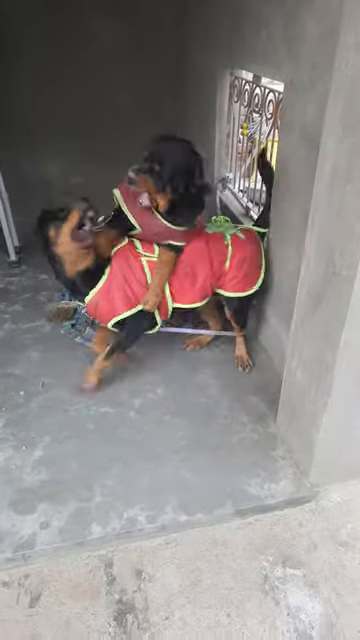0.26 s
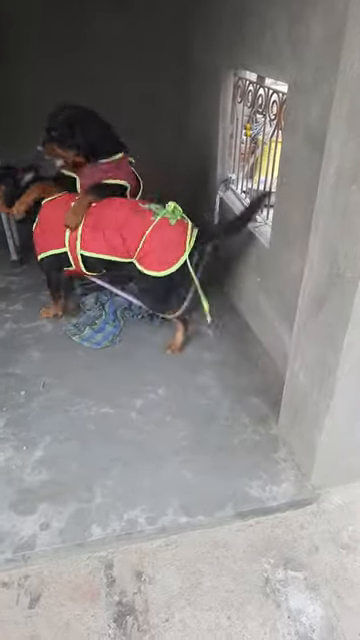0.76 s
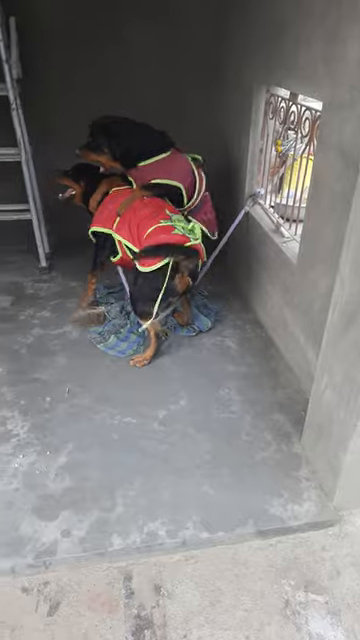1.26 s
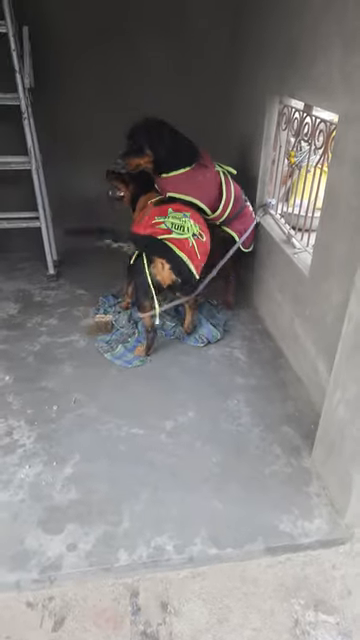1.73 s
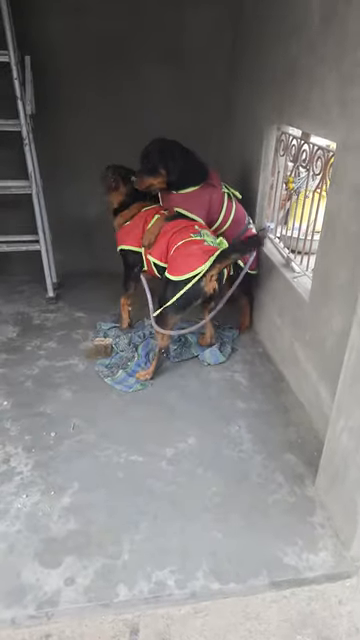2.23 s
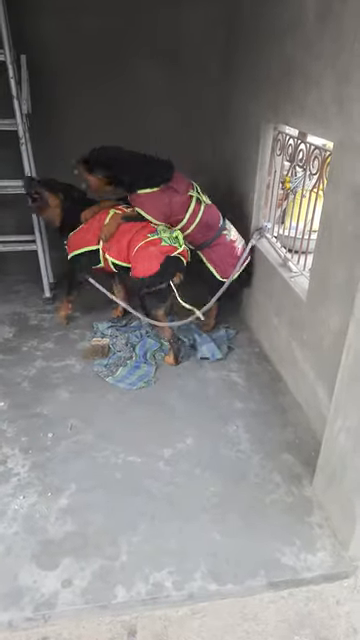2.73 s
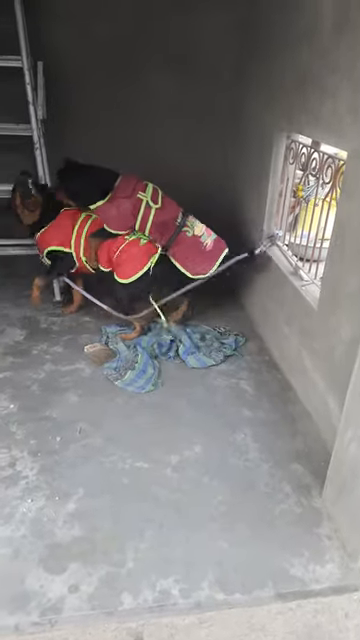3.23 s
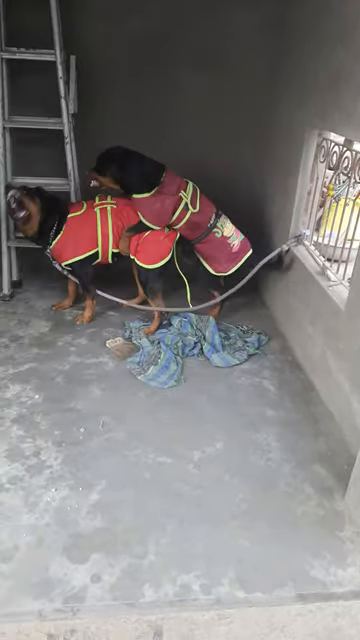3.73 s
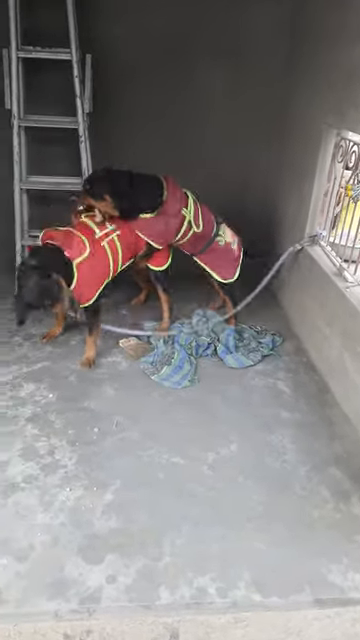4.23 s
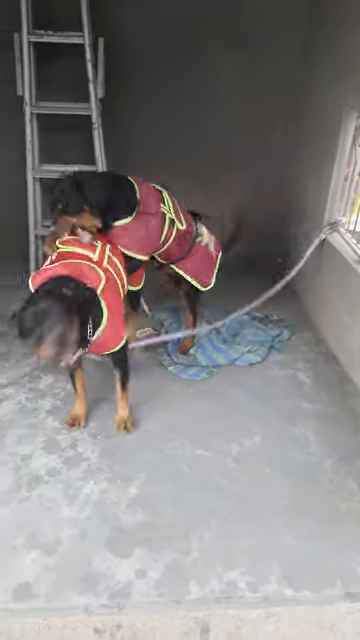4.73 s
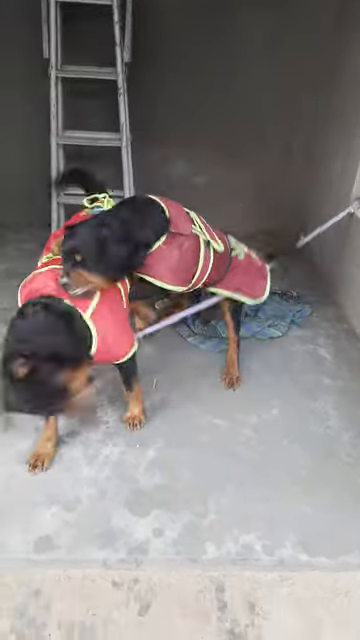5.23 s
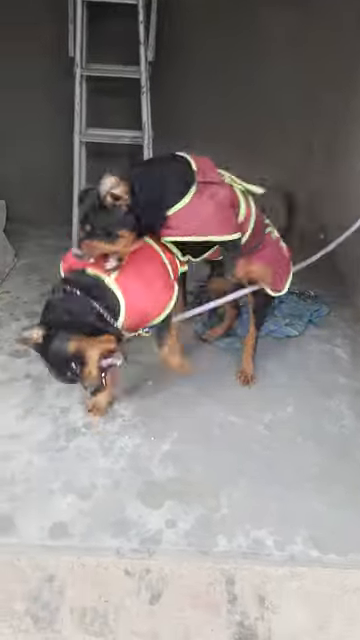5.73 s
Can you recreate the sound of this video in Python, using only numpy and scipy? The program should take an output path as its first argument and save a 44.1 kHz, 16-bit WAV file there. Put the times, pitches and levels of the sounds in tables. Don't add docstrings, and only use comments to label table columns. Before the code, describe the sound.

Two large dogs wrestle in a bare, reverberant concrete room, heard through a stereo phone microphone with a sharp treble edge. Paws and coats scuffle throughout, rising and falling. Two hoarse barks burst out at 0.1 and 0.4 s over a growl, followed by single barks at 0.7, 1.1 and 1.35 s, with firm low thumps near 1.45 s. Growling fills the gap before a bark at 2.0 s; another comes at 2.6 s with the hardest thump just after. A tight flurry runs from 3.2 to 3.8 s, one bark high and more sung. Barks at 4.3 and 4.55 s lead to a thump, then weaker, rising yaps around 5 s, a strong one at 5.3 s and a last at 5.6 s. A long, loud chest drone swells from 5.7 s to the end. Walls ring about half a second after each bark; quiet sounds duck under them.

```python
import sys
import numpy as np
from scipy import signal
from scipy.fft import rfft, irfft
from scipy.io import wavfile
from scipy.ndimage import uniform_filter1d, minimum_filter1d

SR = 44100
rng = np.random.default_rng(int(sys.argv[2]) if len(sys.argv) > 2 else 0)


def ratio_of_db(decibels):
    return 10 ** (np.asarray(decibels, float) / 20)


def master(y):
    cut = np.clip(np.atleast_2d(y).T, -1, 1)
    pcm = np.round(cut * 32767)
    wavfile.write(sys.argv[1], SR, pcm.astype(np.int16))


N = 263277


def evened(x):
    return x / np.sqrt(np.mean(x ** 2) + 1e-20)


def read(points, hz):
    f, value = np.transpose(points)
    return np.interp(np.log(hz + 1), np.log(f + 1), value)


def add(mix, start_s, sound):
    part = mix[..., round(start_s * SR):][..., :sound.shape[-1]]
    part += sound[..., :part.shape[-1]]


def colour(x, db_points):
    n = x.shape[-1]
    return irfft(rfft(x) * ratio_of_db(read(db_points, np.fft.rfftfreq(n, 1 / SR))), n)


def resonate(x, hz, width):
    turn = np.exp(2j * np.pi * np.cumsum(hz * np.ones(len(x))) / SR)
    r = np.exp(-np.pi * width / SR)
    smooth = signal.lfilter([(1 - r) ** 2], [1, -2 * r, r * r], x / turn + 1e-18)
    return 2 * (turn * smooth).real


def wobble(n, span):
    once = uniform_filter1d(rng.standard_normal(n), int(span))
    return evened(uniform_filter1d(once, int(span)))


def swells(rows):
    t = np.arange(N) / SR
    total = ratio_of_db(-61)
    for start, length, db in rows:
        arch = np.sin(np.pi * np.clip((t - start) / length, 0, 1)).clip(0)
        total = total + ratio_of_db(db) * np.sqrt(arch)
    return 20 * np.log10(total)


# (frequency [Hz], left-right correlation [-1 to 1])
PORT_LIKENESS = [(30, 0.3), (70, 0.65), (180, 0.77), (550, 0.42), (1650, 0.09), (4970, -0.03),
                 (15000, -0.03)]


def spread(first, other, same):
    return np.array([first, same * first + np.sqrt(1 - same ** 2) * other])


def wash(db_points, patchy_db, flicker_db):
    frames, hz = N // 128 + 5, np.fft.rfftfreq(512, 1 / SR)
    a, b, c, d, patches = rng.standard_normal((frames, 257, 5)).T
    patches = evened(uniform_filter1d(uniform_filter1d(patches, 8, 0), 16, 1))
    same = np.clip(read(PORT_LIKENESS, hz), -1, 1)[:, None]
    z = spread(a + 1j * b, c + 1j * d, same)
    z = z * ratio_of_db(patchy_db * patches + flicker_db * wobble(frames, 9.3))
    noise = signal.istft(z, nperseg=512, noverlap=384)[1][:, :N]
    return evened(colour(noise, db_points))


# (frequency [Hz], time to fall 60 dB [s])
WALL_RING = [(150, 1), (400, 0.45), (800, 0.59), (2000, 0.57), (5000, 0.49), (12000, 0.38)]


def room(x):
    taps = np.zeros((2, SR))
    at = np.arange(60, SR - 20, 20) + rng.integers(0, 20, (2, (SR - 61) // 20))
    np.put_along_axis(taps, at, rng.choice([-1., 1.], at.shape), 1)
    hz, t, z = signal.stft(taps, SR, nperseg=256)
    same = np.clip(read(PORT_LIKENESS, hz) - .12, 0, 1)[:, None]
    z = spread(z[0], z[1], same)
    near_corner = ratio_of_db(-60 * t / .15)
    far_walls = ratio_of_db(-6 - 60 * t / read(WALL_RING, hz)[:, None])
    tail = signal.istft(z * (near_corner + far_walls), SR, nperseg=256)[1]
    return signal.fftconvolve(x, tail / np.linalg.norm(tail[0]), axes=1)[:, :N]


# (time [s], level [dB])
TUSSLE = [(0, -50.5), (.2, -39), (.55, -40), (0.901, -51.5), (1.251, -54.5), (1.66, -48), (2.0, -52.5),
          (2.35, -50), (2.55, -51), (2.83, -41), (3.1, -49.5), (3.572, -39), (3.962, -62), (4.17, -45.5),
          (4.55, -41.5), (4.8, -55.5), (5.14, -37.5), (5.97, -47)]
# (frequency [Hz], level [dB per Hz])
SCUFFLE_TONE = [(200, -10), (330, -1), (500, 1), (800, -0.5), (1300, -7.5), (2500, -15.5), (4600, -18.5),
                (6800, -20.5), (7800, -36), (10000, -33.5), (13000, -33.5), (15800, -34.5)]


def scuffle():
    level_db = np.interp(np.arange(N) / SR, *np.transpose(TUSSLE))
    return ratio_of_db(level_db + 12) * wash(SCUFFLE_TONE, patchy_db=2.0, flicker_db=1.8)


# (start [s], length [s], level [dB])
SHOVES = [(-.1, .2, -56), (.22, 0.13, -44.5), (.66, 0.88, -60), (1.38, 0.15, -45), (2.0, 0.22, -59),
          (2.6, .18, -43.5), (3.05, 0.77, -50.5), (3.55, 0.58, -59.5), (4.08, 0.71, -52), (4.5, 0.71, -56),
          (5.2, 0.43, -44), (5.7, 0.58, -49.5)]
# (frequency [Hz], level [dB per Hz])
RUMBLE_TONE = [(25, -44), (45, -16), (80, 1), (130, 9.5), (200, 12), (320, -74.5)]


def rumble():
    return ratio_of_db(swells(SHOVES) + 4) * wash(RUMBLE_TONE, patchy_db=2.5, flicker_db=1.5)


# (start [s], length [s], level [dB])
HUMS = [
    (.88, 0.25, -53),
    (2.33, 0.25, -56),
    (2.88, 0.27, -60.5),
    (4.05, 0.43, -55),
    (5.72, 0.74, -38),
]


def hum():
    a, b = (evened(resonate(v, 82.4, 11)) for v in rng.standard_normal((N, 2)).T)
    return ratio_of_db(swells(HUMS) + 2 * wobble(N, 3000)) * np.array([a, .7 * a + .7 * b])


# (time [s], peak level [dB], frequency [Hz])
THUMPS = [
    (0.216, -36, 73.5),
    (1.427, -30.5, 117),
    (1.48, -33.5, 136),
    (2.715, -23.5, 121),
    (3.351, -40, 51.7),
    (4.643, -27, 115),
    (5.191, -37, 164),
    (5.379, -29.5, 101),
    (5.896, -38.5, 98),
]


def thumps():
    out, t = np.zeros(N), np.arange(3000) / SR
    for start, db, hz in THUMPS:
        fade = ratio_of_db(db - 60 * t / 0.062)
        rise = np.minimum(t / 0.0019, 1)
        add(out, start, fade * np.sin(2 * np.pi * hz * t) * rise)
    return out * ratio_of_db([[2.], [-3.]])


def folds(hz, rough):
    n = len(hz)
    turns = np.cumsum(hz * (1 + (.01 + 0.13 * rough) * wobble(n, 120))) / SR
    pulses = sum(np.cos(2 * np.pi * k * turns) for k in range(1, 11))
    pulses = pulses * ratio_of_db(3.5 * rough * wobble(n, 250))
    puff = 0.33 + np.exp(-(turns % 1) / 0.13)
    air = puff * rng.standard_normal(n) * ratio_of_db(2.5 * wobble(n, 250))
    return (1 - rough) * evened(pulses) + rough * evened(air), air


# (start [s], length [s], level [dB])
GROWLS = [(.1, 0.23, -35.5), (.45, 0.39, -55), (1.0, 0.53, -49.5), (1.58, 0.49, -47), (2.38, 0.55, -54),
          (3.0, 0.3, -56), (3.75, 0.33, -44), (4.2, 0.28, -49), (4.95, 0.4, -40.5), (5.68, 0.38, -45)]
# (frequency [Hz], width [Hz], level [dB])
GROWL_THROAT = [
    (222, 40, 0),
    (475, 70, -3),
    (695, 80, -5),
    (930, 120, -12),
]


def growl():
    drive, _ = folds(112 * (1 + .03 * wobble(N, 3000)), rough=.38)
    throat = sum(ratio_of_db(db) * resonate(drive, hz, width) for hz, width, db in GROWL_THROAT)
    throb_db = 5.7 * wobble(N, 1200)
    return ratio_of_db(swells(GROWLS) + throb_db) * evened(throat) * np.ones((2, 1))


def gesture(t, length, level_db, swell_s, sag_db):
    u = t / length
    swell = np.minimum(t / swell_s, 1)
    sag = np.maximum(t - swell_s, 0) / (length - swell_s)
    effort_db = level_db - 13 * (1 - swell) ** 2 + sag_db * sag ** 2
    wide = min(1.07 * swell_s / length, .7)
    opening = np.maximum(1 - u / wide, 0)
    shutting = np.maximum(u - wide, 0) / (1 - wide)
    jaws_db = -8.5 * opening - 18 * shutting ** 1.78
    chest_db = 15.5 * (2 * u - 1) ** 2
    return effort_db, jaws_db, chest_db


# (frequency [Hz], level [dB per Hz])
RASP_TONE = [(1530, -20.5), (2600, -0.5), (3600, -4), (4310, -4.5), (4980, -1), (6390, 2), (6990, -1.5),
             (8250, -23), (10000, -22), (13000, -18.5), (15800, -23.5)]


def bark(row, pitch, rough, pan_db, second_hz, third_hz, open_db, breath_db):
    start, length, *push = row
    *partial_hz, chest_db = pitch
    t = np.arange(0, length, 1 / SR)
    effort_db, jaws_db, edge_db = gesture(t, length, *push)
    hz = np.polyval(np.polyfit([0, .5, 1], partial_hz, 2), t / length)
    drive, air = folds(hz / 2, rough)

    sink = (hz / hz.mean()) ** 1.12
    upper = ratio_of_db(-7) * resonate(drive, third_hz * sink, 327)
    upper = upper - resonate(drive, second_hz * sink, 380)
    upper = upper + ratio_of_db(-8) * resonate(drive, 1580 * sink, 730)
    upper = upper - ratio_of_db(-13 - 150 * t) * resonate(drive, 2800 - 4000 * t, 450)

    mouth = resonate(drive, hz, 260) + resonate(drive, 797, 430)
    mouth = mouth + resonate(drive, hz, 110)
    chest = resonate(.5 * drive + evened(air), np.maximum(hz / 2, 370), 340)
    rasp_db = breath_db + 0.56 * jaws_db + 2.9 * wobble(len(t), 670)
    rasp = np.minimum(t / 0.018, 1) * evened(colour(air, RASP_TONE))

    voice = evened(mouth) - ratio_of_db(chest_db + edge_db) * evened(chest)
    voice = voice + ratio_of_db(open_db + jaws_db) * evened(upper) + ratio_of_db(rasp_db) * rasp
    edges = np.clip(np.minimum(t / .011, (length - t) / 0.013), 0, 1)
    pan = ratio_of_db(np.array([[1], [-1]]) * np.clip(pan_db, -3, 5) / 2)
    return start, ratio_of_db(effort_db) * voice * edges * pan


# (start [s], length [s], effort [dB], swell [s], sag over the hold [dB])
BARKS = [(.1, .25, -10.5, 0.077, -9.5), (0.368, .19, -12.5, 0.085, -18), (0.691, 0.16, -17, 0.035, 14),
         (1.103, 0.12, -15, 0.088, -12.5), (1.349, 0.18, -14.5, 0.059, 6.5), (2.039, .18, -12, 0.038, -7.5),
         (2.626, 0.16, -13.5, 0.075, -1.5), (3.196, .18, -11.5, 0.085, -5.5),
         (3.354, .125, -7.5, 0.058, -2.5), (3.561, .21, -10.5, 0.075, -17.5),
         (3.788, .2, -20.5, 0.068, -12.5), (4.274, 0.17, -13.5, 0.055, -2), (4.539, 0.16, -11.5, 0.071, -3),
         (4.909, 0.16, -21.5, 0.097, -12.5), (5.09, .13, -18.5, 0.0087, 11.5),
         (5.268, .17, -9.5, 0.13, 2.5), (5.578, 0.13, -11.5, 0.077, 0)]
# (strongest partial at start, middle, end [Hz] = twice the fold rate; chest [dB])
PITCH = [(741.5, 640, 530, -23.5), (749, 855, 640, -20), (671, 595, 515, -30.5), (826, 800, 840, -14),
         (781, 655, 545, -26), (731.5, 590, 455, -18), (770, 665, 619, -14), (710, 655, 726, -19.5),
         (801, 858, 870, -31.5), (716, 630, 579, -41), (705, 735, 699, -12), (826, 872, 880, -18.5),
         (701, 635, 535, -20), (454, 570, 806, -3.5), (638.7, 790, 797, -19), (638, 690, 560, -22.5),
         (740, 690, 650, -24.5)]
ROUGH = [.6, .58, .5, .62, .6, .55, .7, .6, .42, .5, .75, .52, .5, .7, .4, .6, .6]
# (left-right [dB], second throat resonance [Hz], third [Hz], mouth opening [dB], rasp [dB])
VOICES = [(0.5, 1120, 1790, -2.5, -23), (0.5, 1100, 1910, -3.5, -19), (0.5, 1007, 1630, 1, -23),
          (-0.5, 1070, 1950, -2, -24), (0, 1054, 1730, -0.5, -23.5), (0, 1045, 1660, -2.5, -23.5),
          (-0.5, 973, 1854, 5.5, -19.5), (-0.5, 1100, 1970, -0.5, -21.5), (1, 1170, 1820, -8, -29),
          (-1, 1080, 1680, -5.5, -25.5), (0, 1230, 2070, -2, -22.5), (-0.5, 1275, 1920, -2.5, -22),
          (-0.5, 1010, 1650, -1, -21.5), (1.5, 1020, 2050, 2.5, -25), (0.5, 1250, 1840, 2, -23.5),
          (-1.5, 996, 1730, -2, -23.5), (0.5, 1240, 1760, -12, -21)]


def barking():
    places = np.zeros((3, 2, N))
    for k, (row, pitch, rough, voice) in enumerate(zip(BARKS, PITCH, ROUGH, VOICES)):
        add(places[k % 3], *bark(row, pitch, rough, *voice))
    return colour(places, [(100, -50), (200, -26), (300, -13), (380, 0)])


def ducking(loud):
    power_db = 10 * np.log10(abs(uniform_filter1d((loud ** 2).mean(0), 2400)) + 1e-9)
    fall = np.arange(N) * 110. / SR
    return np.maximum(np.maximum.accumulate(power_db + fall) - fall + 38, 0)


def hold_down(x):
    power_db = 10 * np.log10(abs(uniform_filter1d((x ** 2).mean(0), size=160)) + 1e-9)
    back = np.arange(N) * 70 / SR
    over_db = np.maximum(np.maximum.accumulate(power_db + back) - back + 9, 0)
    return x / ratio_of_db(.75 * uniform_filter1d(over_db, size=100))


def squelch(x, below_db):
    hz, t, z = signal.stft(x, SR, nperseg=2048)
    band_db = 10 * np.log10(uniform_filter1d(abs(z) ** 2, size=9, axis=1) + 1e-16)
    masked = band_db < band_db.max(1, keepdims=True) - below_db
    dropped = masked & (hz[:, None] > 2800)
    return signal.istft(z * np.where(dropped, ratio_of_db(-25), 1), SR, nperseg=2048)[1][:, :N]


def scene():
    low = growl()
    quiet = scuffle() + rumble() + hum()
    quiet = quiet + ratio_of_db(1.5) * low + ratio_of_db(-5.5) * room(low)
    loud = sum(ratio_of_db(-4) * dogs + ratio_of_db(1) * room(dogs) for dogs in barking())
    return loud + thumps() + quiet / ratio_of_db(.32 * ducking(loud))


def top_cut(x):
    return signal.sosfilt(signal.butter(12, 16370, fs=SR, output="sos"), x)


# (frequency [Hz], left-right [dB])
PORT_BALANCE = [(30, 11), (80, 5), (200, 3), (640, 1.5), (1400, .3), (3100, 1.5), (6500, 3), (8000, 9),
                (15000, 9)]


def record(dry):
    tilt_db = read(PORT_BALANCE, np.fft.rfftfreq(N, 1 / SR)) * np.array([[.5], [-.5]])
    x = hold_down(irfft(rfft(dry) * ratio_of_db(tilt_db), N))
    headroom = minimum_filter1d(1 / np.maximum(abs(x), 1), size=301)
    x = x * uniform_filter1d(headroom, size=201)
    x = colour(squelch(x, below_db=57), [(12, -36), (55, 0), (15800, 0), (15900, -70)])
    return top_cut(x)


dry = scene()
out = record(dry)
master(out)
```